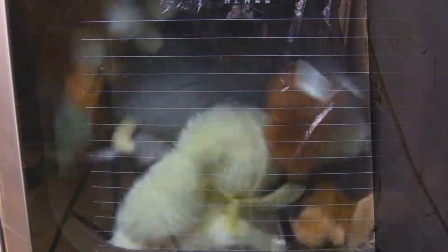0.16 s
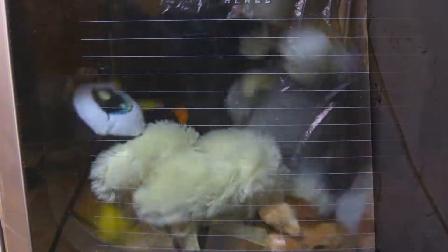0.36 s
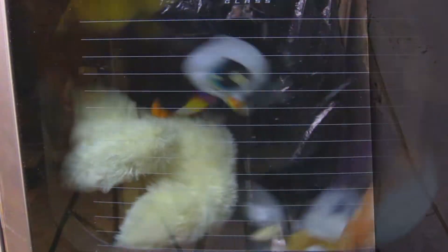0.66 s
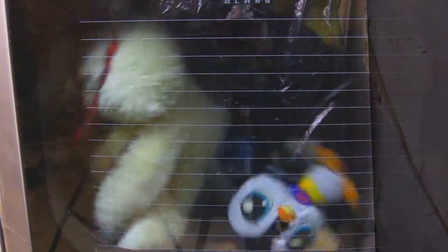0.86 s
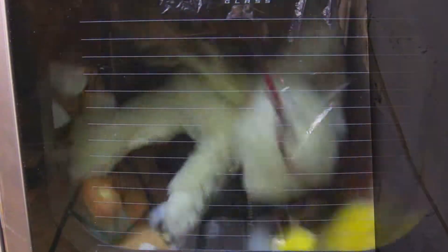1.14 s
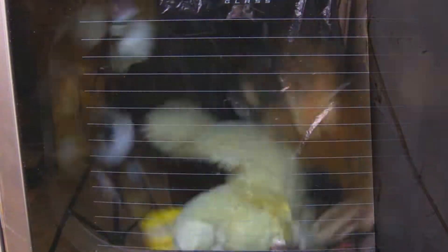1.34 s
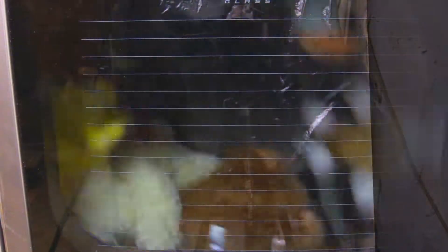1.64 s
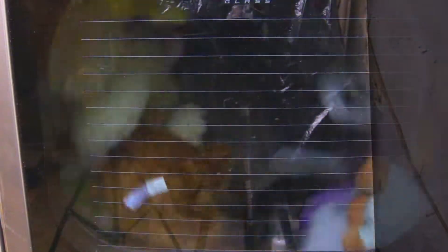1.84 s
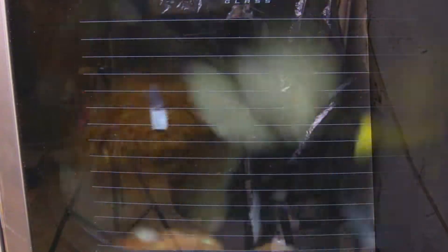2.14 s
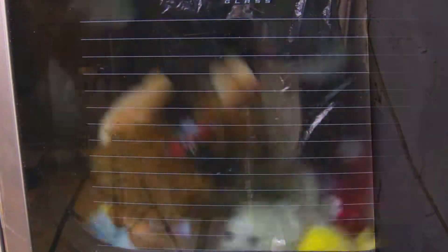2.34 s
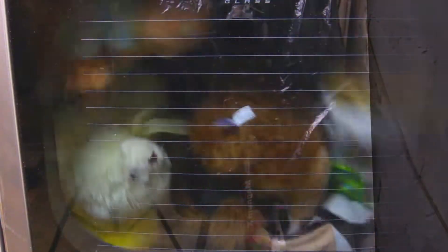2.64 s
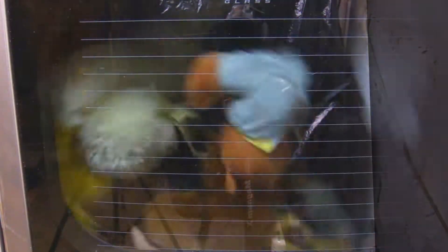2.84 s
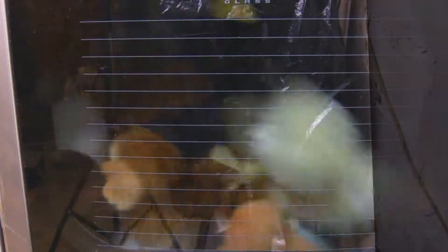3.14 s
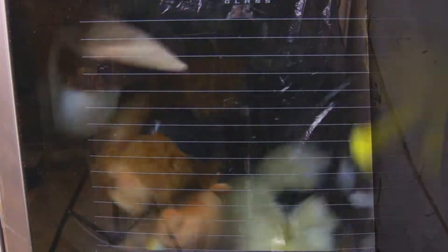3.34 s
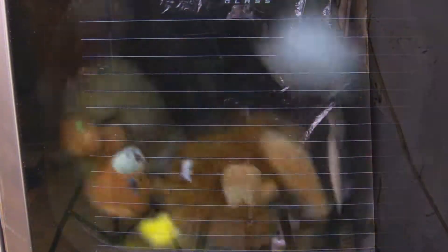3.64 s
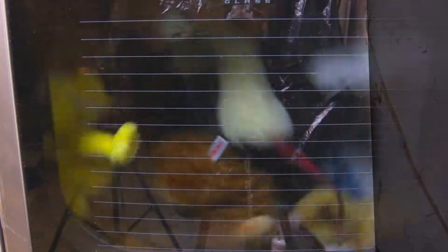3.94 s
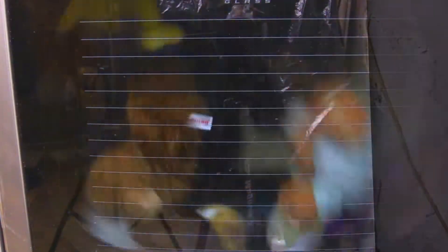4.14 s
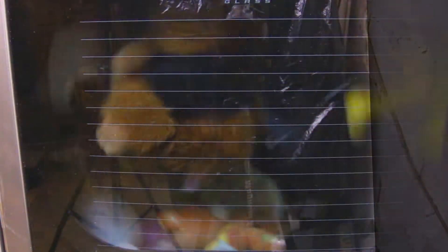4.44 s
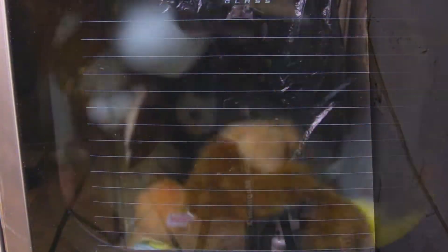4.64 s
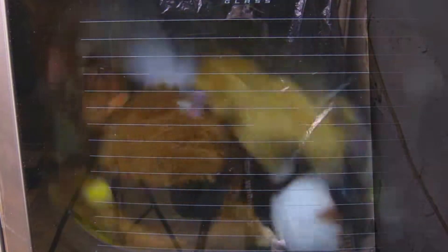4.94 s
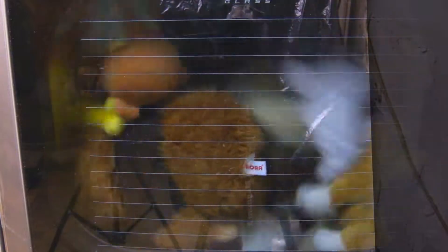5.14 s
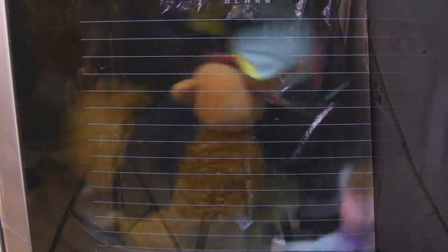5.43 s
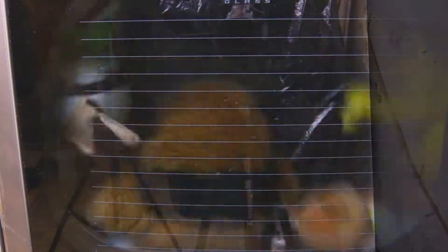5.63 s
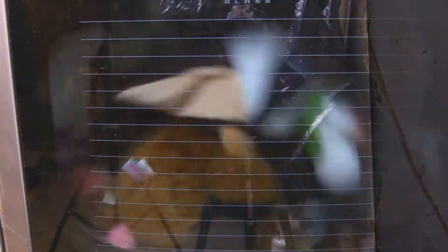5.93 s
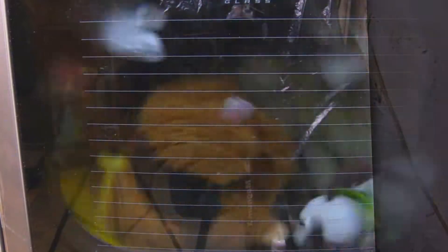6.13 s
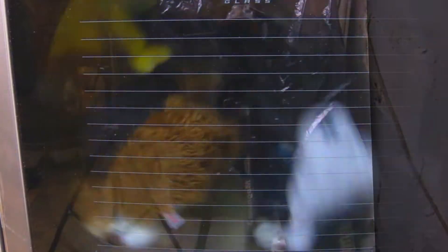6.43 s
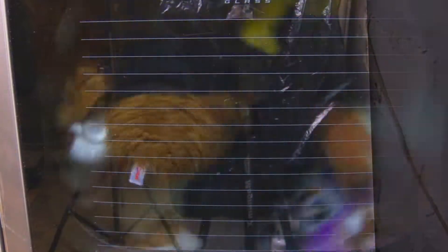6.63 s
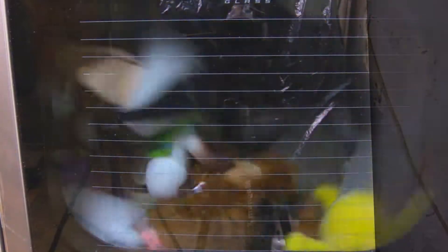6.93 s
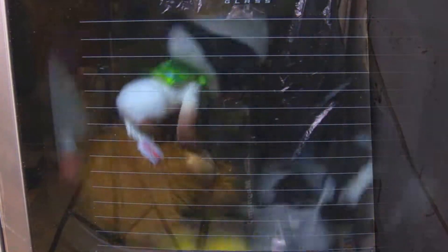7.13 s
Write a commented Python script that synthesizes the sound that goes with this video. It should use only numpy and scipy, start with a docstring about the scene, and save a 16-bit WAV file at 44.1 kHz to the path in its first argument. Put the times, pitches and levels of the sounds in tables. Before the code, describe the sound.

A clothes dryer hums and hisses steadily while tumbling soft toys knock, clatter and thud irregularly against the ringing steel drum and door.

```python
"""Hard knocks and dull thuds tumble over the steady hum, rumble and hiss of a clothes dryer in a small room.
Soft toys tumble inside: hard parts (plastic eyes, noses, tags) ring the many modes of the steel drum and door,
with a wash of diffuse noise; soft bodies push the panels into short low tones.
Motor and shafts are sine tones; rollers, blower and sliding fur are shaped noise.
Two microphone ports at the door hear it in stereo, and a limiter ducks whatever passes full scale."""
import sys
import numpy as np
from scipy import signal
from scipy.fft import rfft, irfft, next_fast_len
from scipy.io import wavfile
from scipy.ndimage import uniform_filter1d, minimum_filter1d, map_coordinates

SR = 44100
rng = np.random.default_rng(int(sys.argv[2]) if len(sys.argv) > 2 else 0)


def dump_mix(stems):
    """Bounce the given channels to the path in sys.argv[1] as a 16-bit WAV at rate SR."""
    frames = np.atleast_2d(stems).T  # one column per channel
    limited = np.clip(frames, -1, 1)  # hard clip at full scale
    pcm = np.round(limited * 32767).astype(np.int16)
    wavfile.write(sys.argv[1], SR, pcm)


N = 321048  # length in samples

# Hard parts striking drum and door. Each row: start in seconds, level in dB around 1.5 kHz before the common trim,
# weight in dB at 0.7 kHz, hardness in dB and click in dB (both spread over the treble by CONTACT_TREBLE),
# two rings in Hz favoured by the struck spot, their lift in dB, build-up time constant in ms,
# level in dB of the slow tail beside the fast first fall.
KNOCKS = [(0.001, -19.5, -2.5, -20.5, -44, 570, 2110, 4, 0.27, 7),
          (0.109, -23, -15, -15, -40, 1580, 2440, 2, 3.4, -1),
          (0.241, -10, -6, -12, -29, 1916, 760, 15.6, 13, -8),
          (0.257, -15, 7, -19, -38, 1900, 2510, 14, 1.5, 0),
          (0.63, -10, -5, -2.5, -21, 1960, 1203, 8.7, 8, -6.5),
          (0.751, -20.5, -2.5, 0, -16, 2460, 775, 6.6, 3.5, 2.5),
          (0.925, -26, -1, -9, -33, 2320, 1960, 6, 7, 1),
          (0.989, -19.5, -1, -6.5, -43, 1640, 2380, 2, 4.7, -5),
          (1.149, -6.5, -0.5, -14.5, -57, 1610, 2530, 7, 6.3, -8),
          (1.408, -25, 3, -18, -46, 3760, 2530, 4.5, 7, -11),
          (1.452, -28.5, -15, -24, -52, 1474, 2190, 6, 1.4, -10),
          (1.589, -18, -3.5, -5, -22, 1080, 2295, 12.6, 4.5, 2),
          (1.661, -13, 0.5, -13.5, -43, 2360, 785, 5.5, 1.9, -3),
          (1.692, -19.5, -12, -2.5, -27, 1700, 2340, 5, 1.2, -3),
          (1.756, -11, -3, -8, -28, 2610, 4000, 10, 2.8, -6),
          (1.872, -22.5, -10, -5, -39, 4060, 790, 6, 3.9, -5),
          (2.585, -19.5, 6, -23, -49, 650, 3220, 6, 5.1, -21),
          (2.606, -5.5, -5, -7.5, -43, 3260, 1490, 1.8, 3.5, -7.5),
          (2.754, -34, -13, -6, -19, 2400, 5110, 12, 6.2, -3),
          (2.813, -33.5, -24, -2.5, -26, 6870, 850, 7, 4.8, -10),
          (3.021, -23.5, 1, -5.5, -24, 2500, 1597, 12.5, 4.6, 3),
          (3.288, -26, 3.5, -15, -28, 1860, 2330, 3.8, 2, 0),
          (3.357, -14, -2.5, -9, -29.5, 2600, 1730, 7.3, 2.7, 4),
          (3.403, -15.5, -5.5, -3.5, -34, 1830, 976, 9.3, 3.6, -8),
          (3.6, -28, 6.5, -38, -48, 690, 1310, 3.8, 3.8, -7),
          (3.654, -20.5, 6, -45, -52, 1180, 1330, 9, 8, 0),
          (3.853, 6.5, -5, -2.5, -33.5, 1360, 1267, 10, 0.96, -10.5),
          (3.866, 3, -4, -11, -18, 1430, 1820, 4.9, 1.4, -8.5),
          (3.938, -8.5, -4, -5, -27, 1460, 1830, 9.8, 16, 1),
          (4.073, 1, -5.5, -4.5, -22.5, 5480, 2435, 9.4, 1.5, -5.5),
          (4.378, -28, 5, -6, -28, 2010, 1070, 14, 9.8, -13),
          (4.405, -18, -3, -15, -48, 2050, 2600, 13, 10, -7),
          (4.484, -5.5, -1, -7, -25, 830, 1599, 12.3, 13.4, -4),
          (4.596, -6.5, -2, 2, -23.5, 3800, 3000, 3.4, 13, -9),
          (4.871, -18.5, -1.5, -13.5, -40, 2300, 1720, 3.6, 4.4, -6),
          (5.0, -7.5, 3.5, -3, -42.5, 1590, 747, 9.2, 2.8, -22),
          (5.088, -25.5, -16, -8.5, -33, 4280, 1880, 4, 3.3, -2),
          (5.128, -12.5, -1, -21, -52, 780, 2900, 1, 0.99, -12.5),
          (5.369, -19, -8.5, -6.5, -13.5, 3040, 4330, 13.3, 4.7, -3.5),
          (5.809, -32.5, 13, -5, -13, 2120, 3940, 6.4, 3.4, -13),
          (5.833, -20, 3, -19, -30.5, 2030, 3900, 6.2, 12, -17),
          (5.849, -12.5, 0, -11, -39, 2080, 2640, 7.5, 0.66, -9),
          (6.112, -33, 20, -17, -37, 550, 2000, 6.5, 3.6, -7),
          (6.218, -13.5, -1, -8, -36, 1480, 2550, 6.7, 3.7, -5),
          (6.334, -16.5, 6.5, -1.5, -8, 770, 2500, 6.2, 7, -7),
          (6.343, -11, -9, 2, -12.5, 2450, 810, 2.9, 1.8, -5),
          (6.611, -1, -5.5, -16, -44, 1860, 2650, 3.9, 15.7, -12.5),
          (6.888, -34.5, 5, -2.5, -38, 2220, 1590, 5.6, 4.7, 1),
          (6.971, -24, -0.5, -9.5, -53, 2430, 3800, 8.2, 3, 1),
          (7.057, -31, -1, -8, -46, 1770, 570, 1, 2.7, -3),
          (7.156, -25.5, -3, -13.5, -52, 1110, 2600, 4.6, 7.6, -13.5)]
# Soft bodies dropping on the drum. Each row: start in seconds, level in dB before the common trim,
# pitch in Hz, t60 in seconds.
THUDS = [(0.239, -13, 247, 0.067), (2.244, -20, 340, 0.082), (2.568, -16.5, 263, 0.09),
         (2.882, -22, 104, 0.26), (3.401, -23, 324, 0.049), (4.277, -21, 106, 0.2), (4.55, -25, 424, 0.29),
         (4.881, -21, 236, 0.16), (5.839, -20, 100, 0.1), (6.11, -18, 325, 0.077), (6.932, -22, 230, 0.13)]
# Resonances of the drum. Each row: centre in Hz, width in Hz, lift in dB.
DRUM_RESONANCES = [(603, 27, -1), (781, 8.6, 7), (1137, 28, -3.5), (1455, 35, -8), (1800, 53, -2.5),
                   (2380, 54, -10), (2900, 16, -35), (3890, 46, 3.5), (4310, 88, -1), (4660, 25, -4),
                   (4880, 13, 5), (5420, 30, -5), (6950, 67, 0), (8470, 58, -4)]
# Longest ring of steel and room together. Each row: frequency in Hz, t60 in seconds.
RING_T60 = [(300, 0.74), (1000, 0.44), (2500, 0.5), (6000, 0.4), (12000, 0.24)]
# Steady shaft and blade tones. Each row: frequency in Hz, rms level in dB.
SHAFT_TONES = [(149.39, -44), (167.98, -45.5), (210.45, -54), (251.92, -44), (269.42, -67.5)]
# Colour of rollers and cabinet. Each row: frequency in Hz, relative density in dB per Hz.
RUMBLE_COLOUR = [(15, -29), (45, -19), (80, -13), (103, 1), (130, -5), (170, -11), (190, -10), (225, -2.5),
                 (255, -2.5), (290, -9.5), (345, -11), (500, -16.5), (850, -19.5), (1300, -46),
                 (2200, -120)]
# Colour of blower and sliding fur. Each row: frequency in Hz, relative density in dB per Hz.
AIR_COLOUR = [(470, -22), (800, -6), (862, -4.5), (1010, -4), (1340, -4), (1570, -9.5), (1820, -6),
              (3040, -17.5), (3280, -17.5), (15800, -44)]
# Late sound of the room. Each row: frequency in Hz, t60 in seconds.
ROOM_T60 = [(300, 1), (1500, 0.5), (5000, 0.56), (12000, 0.43)]
# How alike the two ports sound. Each row: frequency in Hz, left-right likeness from 0 to 1.
LIKENESS = [(60, 0.93), (130, 1), (290, 0.95), (640, 0.81), (1410, 0.62), (3100, 0.47), (6820, 0.47),
            (15000, 0.78)]
# Stereo lean. Each row: frequency in Hz, left minus right in dB.
STEREO_LEAN = [(60, 1.5), (180, 0.5), (550, 3), (1650, 1.0), (4970, 0.5), (15000, 1)]
# How the contact shapes the treble. Each row: frequency in Hz, share of the hardness dB,
# share of the click dB, offset in dB.
CONTACT_TREBLE = [(2670, 0.43, 0, 0.5), (3880, 1, 0, -1.5), (6700, 0.83, 0.42, 1), (11600, 0, 1, 0),
                  (16100, 0, 1, -19)]

MAINS_HZ = 59.98
FALL_T60_S = 0.17  # extra first fall of a knock, while fur damps the steel
TOP_HZ = 15900  # band limit of the output


def amp(db):
    """Turn dB into gain."""
    return 10 ** (np.asarray(db) / 20)


def unit(x):
    """Scale x to rms 1."""
    return x / np.sqrt(np.mean(x ** 2) + 1e-20)


def along(points, hz):
    """Read a curve of (Hz, value) points on a log frequency axis."""
    f, v = np.transpose(points)
    return np.interp(np.log(hz + 1), np.log(f + 1), v)


def wobble(rate):
    """Draw a smooth random curve with `rate` knots a second."""
    knots = rng.standard_normal(int(N * rate / SR) + 4)
    return map_coordinates(knots, [np.arange(N) * rate / SR])


def filtered(x, response):
    """Shape x by a response given as a function of frequency."""
    m = next_fast_len(x.shape[-1] + 8192)
    spectrum = rfft(x, m) * response(np.fft.rfftfreq(m, 1 / SR))
    return irfft(spectrum, m)[..., :x.shape[-1]]


def rush(colour, patchy_db):
    """Make two coloured noises of joint rms 1 that share patches of random gain in time and frequency."""
    z = signal.stft(rng.standard_normal((2, N)), nperseg=1024)[2]
    patches = uniform_filter1d(rng.standard_normal(z.shape[1:]), 8, axis=0)
    patches = unit(uniform_filter1d(patches, 6, axis=1))
    pair = signal.istft(z * amp(patchy_db * patches), nperseg=1024)[1][:, :N]
    return unit(filtered(pair, lambda hz: amp(along(colour, hz))))


def diffuse(length, t60_curve):
    """Make two noises in which each frequency dies at its own speed, as in a diffuse sound field."""
    f, frame, z = signal.stft(rng.standard_normal((2, length)), SR, nperseg=256)
    decay = amp(-60 * frame / along(t60_curve, f)[:, None])
    return signal.istft(z * decay, SR, nperseg=256)[1]


def motor_hum():
    """Magnetic pull hums at twice the mains and its octave, beside steady shaft and blade tones."""
    t = np.arange(N) / SR
    pull = 2 * np.pi * 2 * MAINS_HZ * t
    # the octave trails by a third of its own cycle, which sharpens the troughs
    hum = amp(-33) * np.cos(pull) + amp(-40) * np.cos(2 * pull - 2 * np.pi / 3)
    for hz, db in SHAFT_TONES:
        hum += amp(db) * np.sin(2 * np.pi * (hz * t + rng.random()))
    return np.sqrt(2) * hum  # levels above are rms


def roller_rumble():
    """Rollers shake the cabinet: low noise whose level drifts slightly."""
    return amp(-30.5 + 0.69 * wobble(3.7)) * rush(RUMBLE_COLOUR, patchy_db=2.0)


def blower_air():
    """Blower air and sliding fur hiss; fur bumping the wall swells the hiss, then the swell dies away."""
    bumps = (rng.random(N) < 16 / SR) * rng.uniform(.1, .6, size=N)  # about 16 a second
    t = np.arange(SR // 4) / SR
    bump_shape = (1 - np.exp(-t / 0.017)) * amp(-60 * t / 0.26)
    swell = signal.fftconvolve(bumps, bump_shape)[:N]
    return amp(-43.5 + 0.95 * wobble(4.62)) * (1 + swell) * rush(AIR_COLOUR, patchy_db=2.2)


def contact_points(low_db, hard_db, click_db):
    """A harder contact is shorter and reaches higher: (Hz, dB) points of the blow."""
    points = [(50, -86), (150, low_db - 5.5), (350, low_db - 5.5), (700, low_db), (1500, 0.5)]
    for hz, hard_share, click_share, offset_db in CONTACT_TREBLE:
        points.append((hz, hard_share * hard_db + click_share * click_db + offset_db))
    return points


def resonance_gain(f, spot_hz, lift_db):
    """Resonances of the drum, and clusters of close modes favoured by the struck spot, rise above 1."""
    clusters = [(centre, 0.029 * centre + 40, lift_db) for centre in spot_hz]
    peaks = [amp(db) / (1 + (2 * (f - centre) / width) ** 2)
             for centre, width, db in [*DRUM_RESONANCES, *clusters]]
    return 1 + sum(peaks)


def drum_modes(t):
    """A steel sheet spaces its modes evenly on average: 450 decaying sines and their frequencies."""
    hz = rng.uniform(250, 7000, size=450)
    t60 = along(RING_T60, hz) * rng.uniform(0.32, 1.0, len(hz))
    modes = np.sin(2 * np.pi * (hz[:, None] * t + rng.random((len(hz), 1))))
    return hz, modes * amp(-60 * t / t60[:, None])


def onset_level(x):
    """Level of the first 20 ms between 1 and 2.1 kHz."""
    return np.std(filtered(x[:, :SR // 50], lambda f: (f > 1000) & (f < 2100)))


def knocks():
    """Each blow rings the drum's modes at new strengths, blurred by the diffuse sound of cavity and room."""
    out, t = np.zeros((2, N + SR)), np.arange(SR * 5 // 8) / SR
    hz, modes = drum_modes(t)
    for s, db, low_db, hard_db, click_db, *spot_hz, lift_db, rise_ms, tail_db in KNOCKS:
        points = contact_points(low_db, hard_db, click_db)
        contact = lambda f: amp(along(points, f))
        colour = lambda f: contact(f) * resonance_gain(f, spot_hz, lift_db)
        # each mode has a strength shared by both channels and a random sign and size in each
        shared = amp(3.75 * rng.standard_normal(len(hz)))
        ring = (rng.standard_normal((2, len(hz))) * colour(hz) * shared) @ modes
        noise = diffuse(len(t), RING_T60)[:, :len(t)]
        plain = filtered(noise, contact)
        # the favoured rings melt into the even wash as the sound spreads through drum and room
        wash = plain + (filtered(noise, colour) - plain) * amp(-60 * t / 1.2)
        blow = amp(-7.5) * ring / onset_level(ring) + amp(-3.0) * wash / onset_level(wash)
        # sound builds up in the cavity, falls fast while fur damps the steel, then dies at the drum's pace
        build_up = (1 - np.exp(-t / (rise_ms / 1000))) ** 0.99
        shape = build_up * (amp(-60 * t / FALL_T60_S) + amp(tail_db))
        out[:, round(s * SR):][:, :len(t)] += amp(db - 5.5) * shape / shape.max() * blow
    return out[:, :N]


def thuds():
    """A soft contact only pushes the low panels: two close sines make a short dull tone."""
    out, t = np.zeros(N + SR), np.arange(SR // 4) / SR
    for s, db, hz, t60 in THUDS:
        panels = sum(np.sin(2 * np.pi * hz * ratio * t) for ratio in (1, 1.23)) / 2
        soft_attack = 1 - np.exp(-t / 0.0047)
        out[round(s * SR):][:len(t)] += amp(db + 4.5 - 60 * t / t60) * soft_attack * panels
    return out[:N]


def room(pair):
    """The walls answer late and diffusely, each frequency dying at its own speed."""
    tail = diffuse(SR, ROOM_T60)
    late = np.pad(pair, ((0, 0), (600, 0)))  # 600 samples, about 14 ms
    return signal.fftconvolve(late, tail / np.linalg.norm(tail[0]), axes=1)[:, :N]


def ports(pair):
    """Mix two signals into left and right as mid and side, sharing most where LIKENESS is high."""
    turn = lambda hz: np.arccos(np.clip(along(LIKENESS, hz), -1, 1)) / 2
    mid, side = filtered(pair, lambda hz: np.array([np.cos(turn(hz)), np.sin(turn(hz))]))
    return np.array([mid + side, mid - side])


def scene():
    """Machine and toys add up at the two microphone ports, with a slight stereo lean."""
    machine = motor_hum() + roller_rumble() + blower_air()
    blows = knocks()
    both = ports(machine + blows + amp(-13.5) * room(blows) + thuds())
    return filtered(both, lambda hz: amp([along(STEREO_LEAN, hz) / 2, -along(STEREO_LEAN, hz) / 2]))


def record(dry):
    """A limiter ducks peaks over full scale and lets go after a short hold; then the band is trimmed."""
    need = np.minimum(1, 1.0 / (np.abs(dry).max(0) + 1e-9))
    held = minimum_filter1d(need, size=900, origin=300)  # looks mostly back in time
    gain = uniform_filter1d(held, size=300)
    low_cut = lambda hz: hz ** 2 / (hz ** 2 + 35 ** 2)  # thins the deepest bass
    return filtered(np.clip(dry * gain, -.99, .99), lambda hz: low_cut(hz) * (hz < TOP_HZ))


dry = scene()
out = record(dry)
dump_mix(out)
```